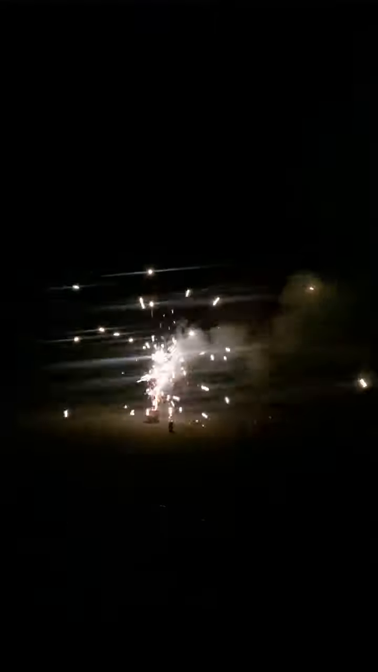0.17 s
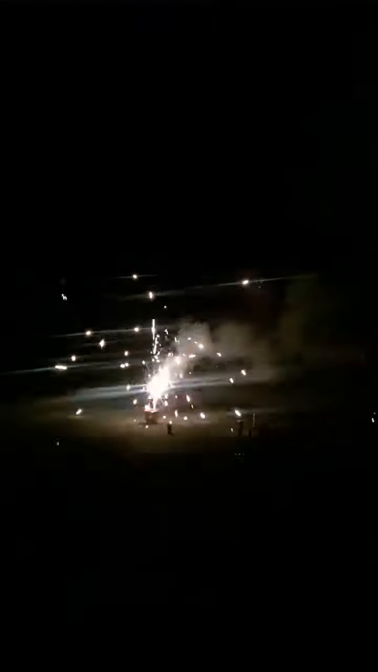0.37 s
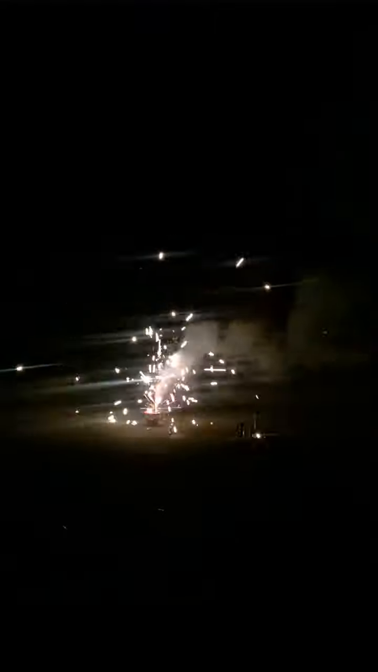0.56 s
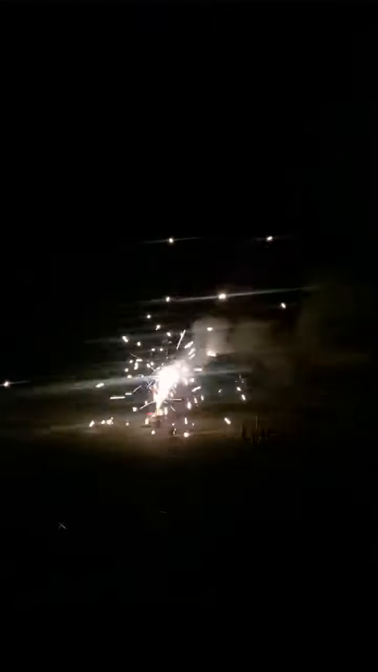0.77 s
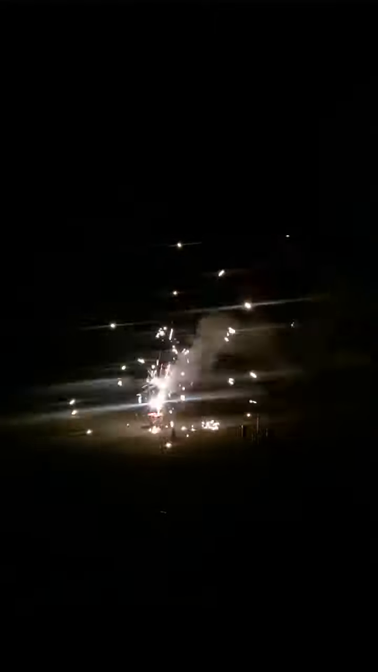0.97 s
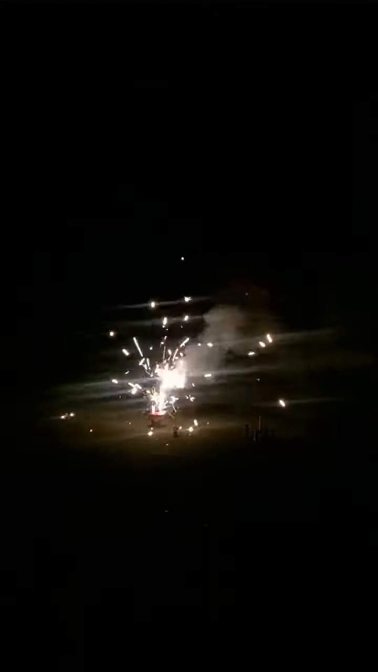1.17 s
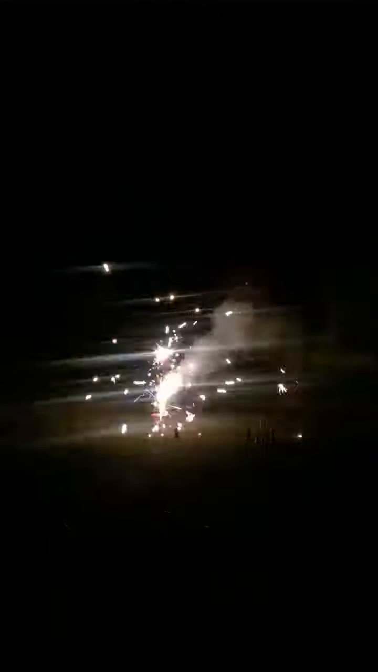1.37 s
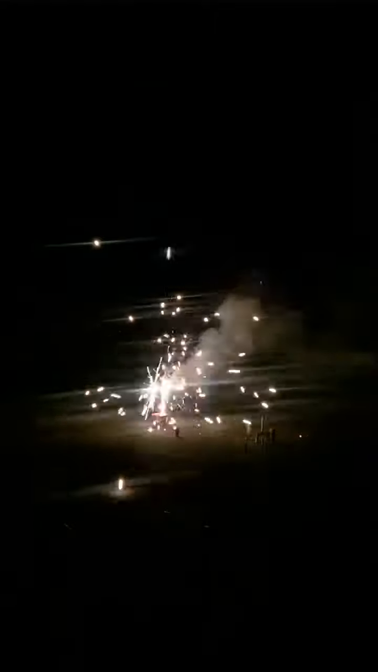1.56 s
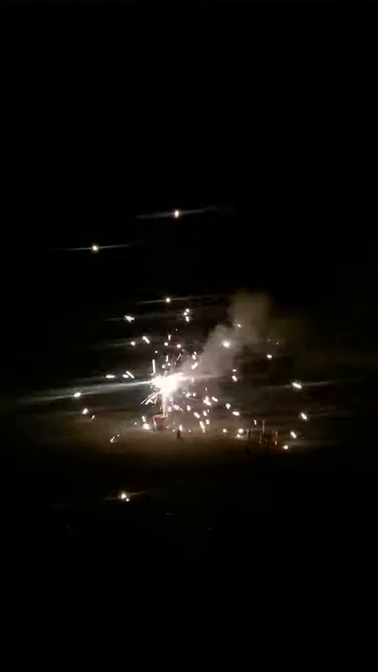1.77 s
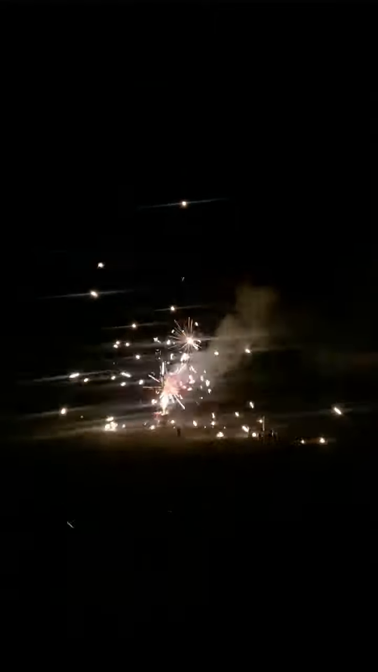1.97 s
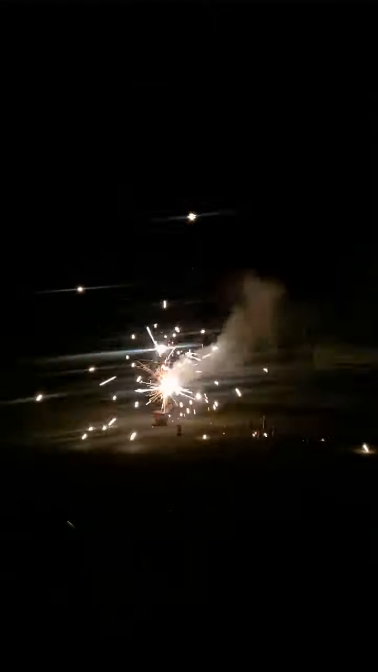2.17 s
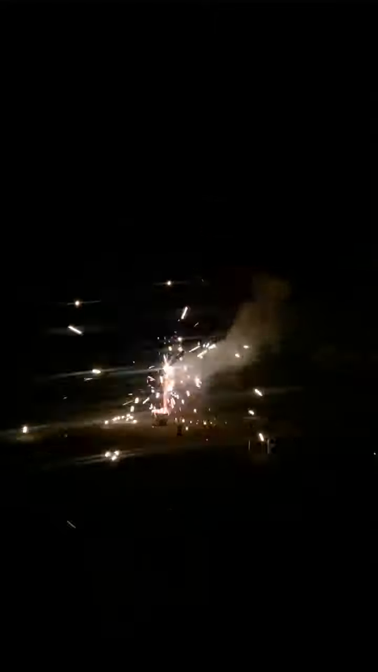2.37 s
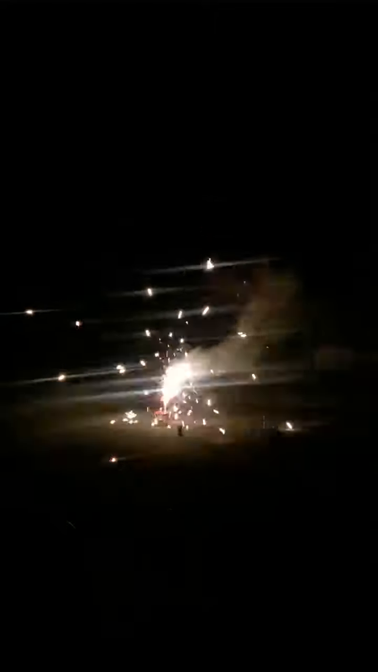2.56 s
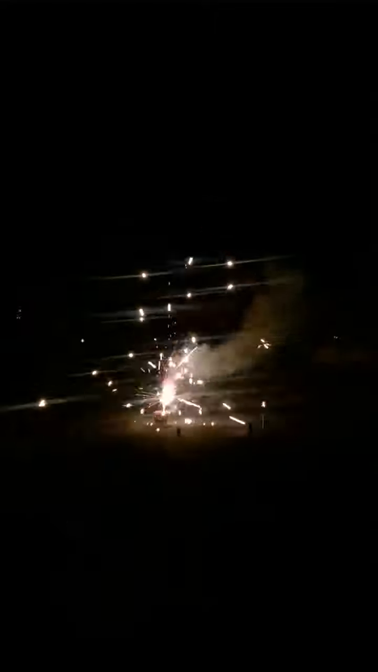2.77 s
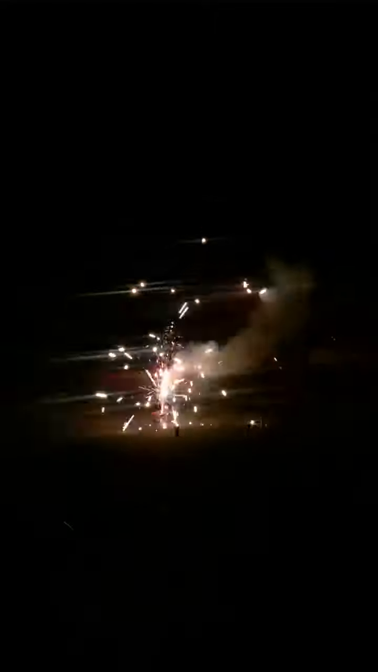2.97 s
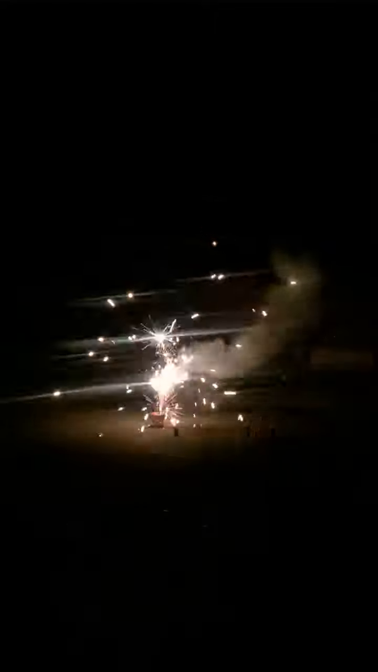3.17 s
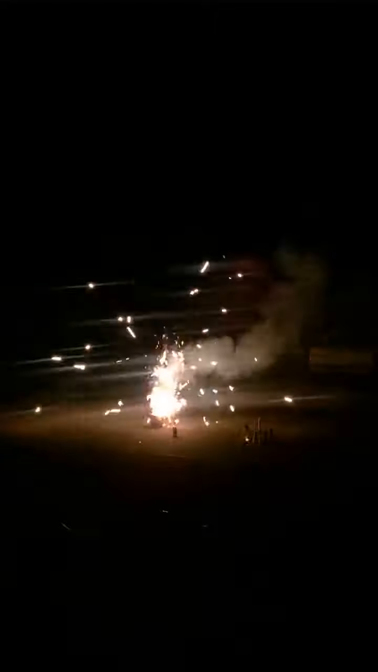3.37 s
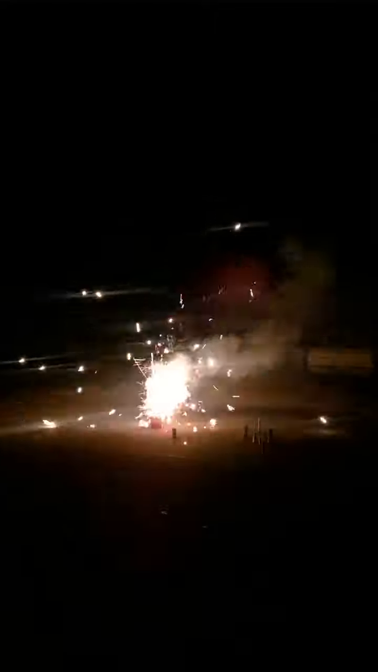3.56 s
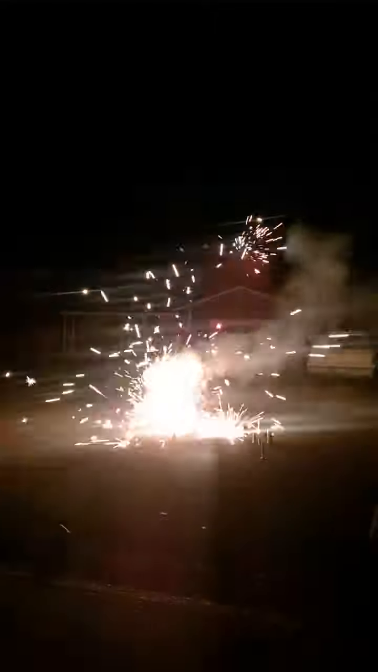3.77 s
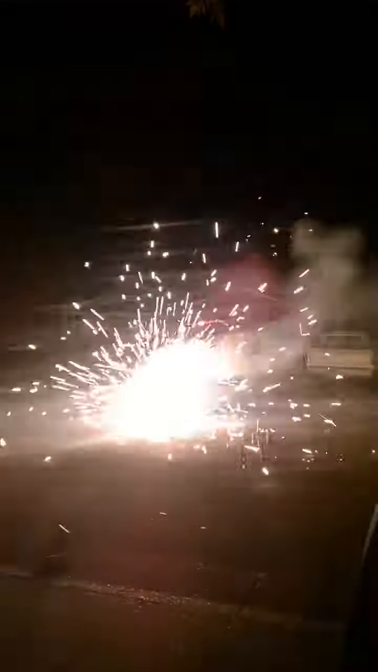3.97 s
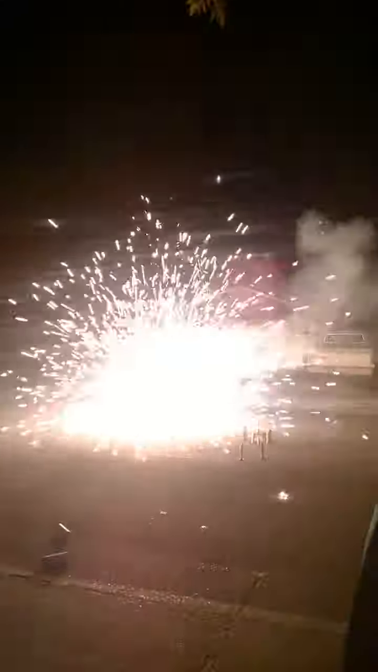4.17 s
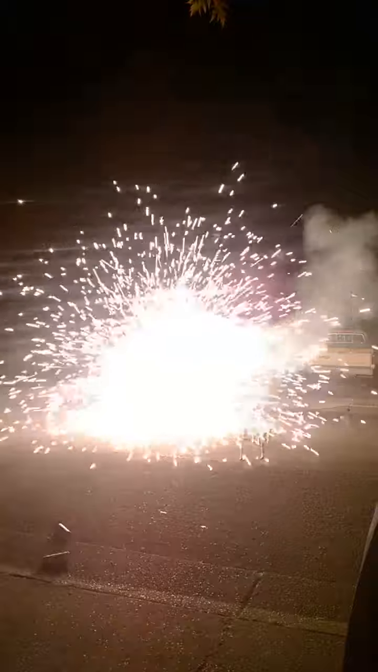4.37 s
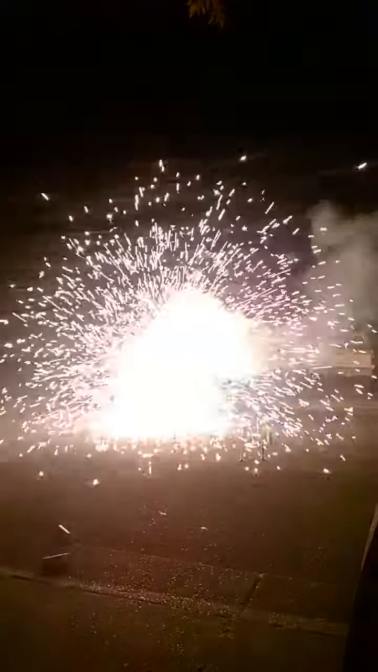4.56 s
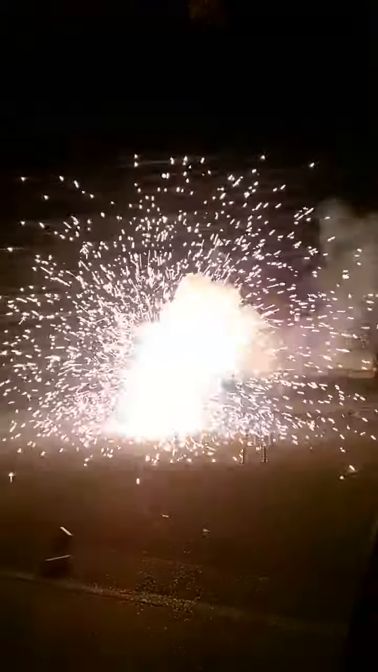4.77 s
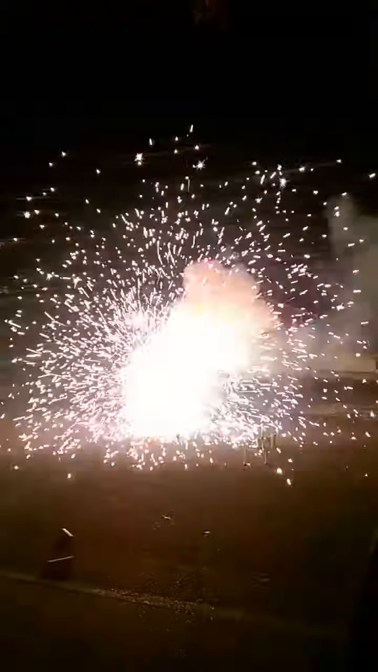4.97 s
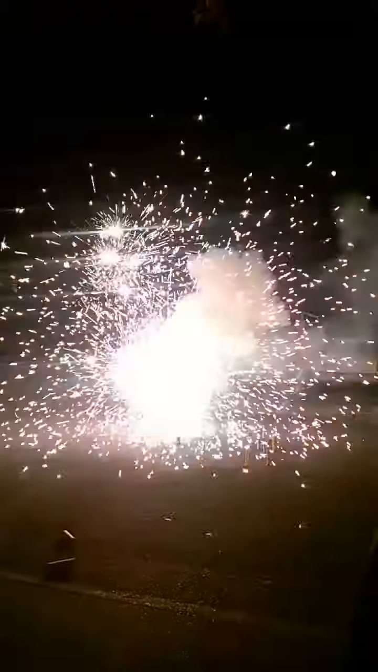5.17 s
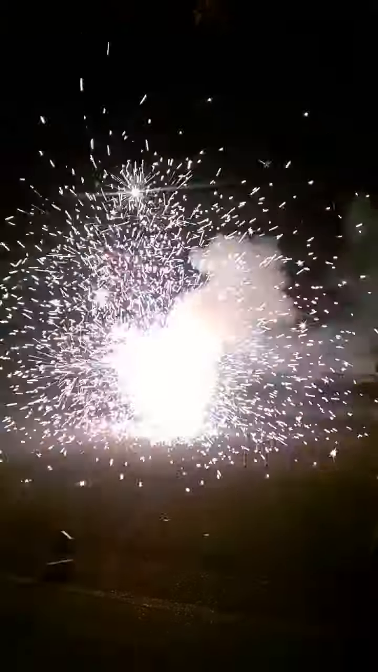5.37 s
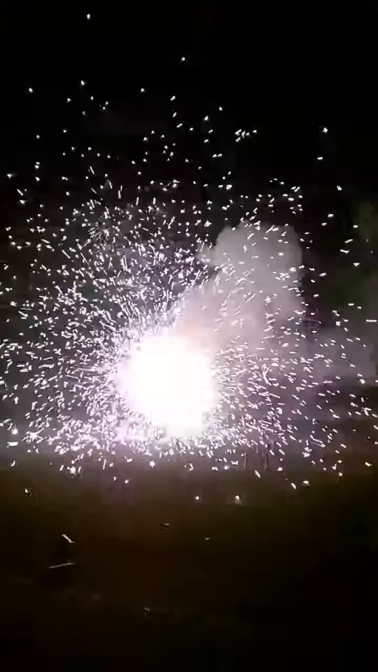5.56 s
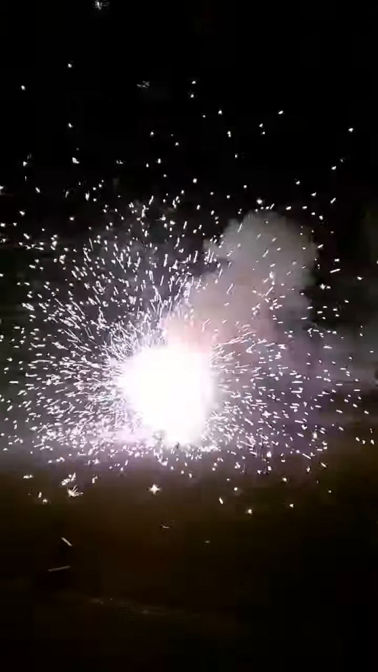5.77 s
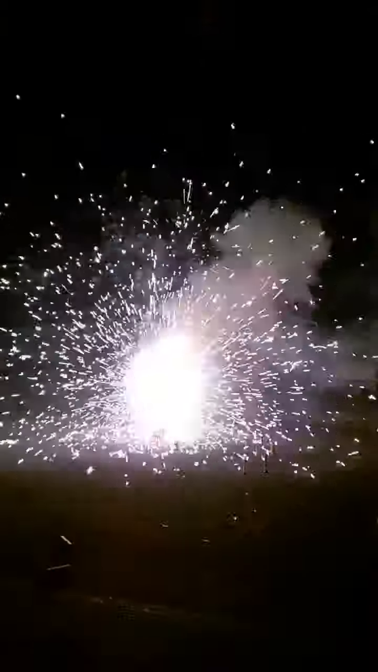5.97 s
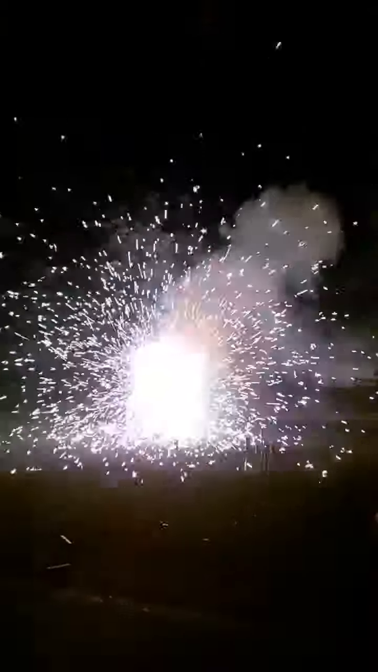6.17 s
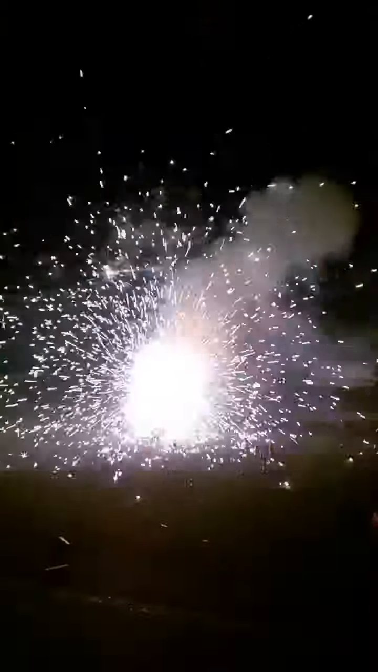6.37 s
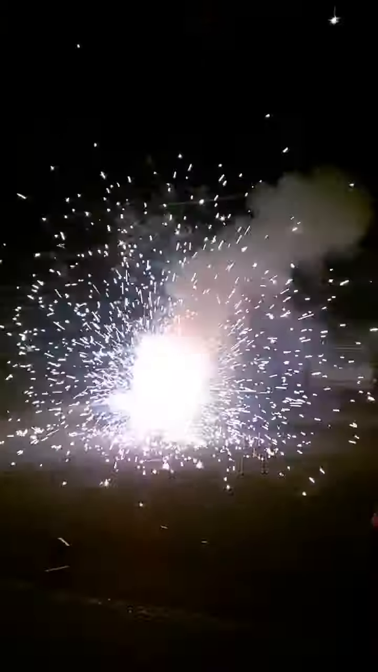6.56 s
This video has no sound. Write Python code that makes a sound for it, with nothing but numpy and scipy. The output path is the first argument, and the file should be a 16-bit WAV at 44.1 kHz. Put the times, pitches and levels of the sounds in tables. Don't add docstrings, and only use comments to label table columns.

```python
import sys
import numpy as np
from scipy import signal
from scipy.fft import rfft, irfft
from scipy.io import wavfile

SR = 44100
rng = np.random.default_rng(int(sys.argv[2]) if len(sys.argv) > 2 else 0)


def int16_out(signal):
    q = np.round(np.clip(np.atleast_2d(signal).T, -1, 1) * 32767)
    wavfile.write(sys.argv[1], SR, q.astype(np.int16))


def makeup_ratio(level_db):
    decades = np.asarray(level_db, float) / 20
    return 10 ** decades


N = 291942
BURST_SAMPLES = 200
BRIGHT_SPREAD_DB = 2.5

# (time [s], level [dB], rate [bursts/s])
SWARM_CURVE = [
    (3.74, -20.5, 40),
    (3.9, -23, 220),
    (4.15, -21.5, 750),
    (5.1, -21, 836),
    (5.14, -21, 250),
    (5.18, -21, 795),
    (5.9, -22, 820),
    (6.27, -21.5, 650),
    (6.62, -23, 680),
]
# (frequency [Hz], density [dB per Hz])
BRIGHT_COLOUR = [(40, -40), (90, -28), (200, -10), (320, -11.5), (520, -10), (1200, -10), (1650, -3.5),
                 (2000, -9), (2450, -7.5), (3600, -7), (5300, 1.5), (7200, -0.5), (10500, -8), (13500, -18),
                 (16000, -25)]


def in_time(rows, s):
    times, *columns = np.transpose(rows)
    return [np.interp(s, times, c) for c in columns]


def coloured(noise, spectrum):
    hz = np.maximum(np.fft.rfftfreq(len(noise), 1 / SR), 1)
    point_hz, point_db = np.transpose(spectrum)
    gain = makeup_ratio(np.interp(np.log(hz), np.log(point_hz), point_db))
    out = irfft(rfft(noise) * gain, len(noise))
    return out / np.std(out)


def ring(x, hz, t60):
    r = makeup_ratio(-60 / (t60 * SR))
    w = 2 * np.pi * hz / SR
    return signal.lfilter([0, np.sin(w)], [1, -2 * r * np.cos(w), r * r], x + 1e-18)


def band(x, low_hz, high_hz):
    return signal.sosfilt(signal.butter(2, [low_hz, high_hz], "band", fs=SR, output="sos"), x)


def lay(s, shapes):
    out = np.zeros(N + BURST_SAMPLES)
    starts = np.round(s * SR).astype(int)[:, None]
    np.add.at(out, starts + np.arange(shapes.shape[1]), shapes)
    return out[:N]


def night_air():
    # (frequency [Hz], density [dB per Hz])
    traffic_colour = [(20, -7), (60, 1.5), (200, -2), (600, -14), (2000, -37), (16000, -45)]
    return makeup_ratio(-47) * coloured(rng.standard_normal(N), traffic_colour)


def thud():
    # (frequency [Hz], level [dB], t60 [s])
    blow_modes = [(169, 5, 0.037), (328, -1, 0.038), (457, 2, 0.032), (650, -1, .04)]
    start_s, echo_s = 0.3122, 0.031
    level_db = -15 + np.array([[0], [-10]])
    blow = lay(start_s + np.array([0, echo_s]), -makeup_ratio(level_db) * np.hanning(40) / 20)
    age = np.arange(N) / SR - start_s - 0.01
    fade = (age > 0) * makeup_ratio(-19 - 60 * np.maximum(age, 0) / 0.33)
    out = band(rng.standard_normal(N), 120, 700) * fade
    for k, (hz, db, t60) in enumerate(blow_modes):
        out = out + (-1) ** k * makeup_ratio(db) * ring(blow, hz, t60)
    return out


def jet():
    # (time [s], level [dB])
    hiss_curve = [
        (0.0, -23.5),
        (0.13, -25),
        (0.38, -25.5),
        (1.95, -23),
        (2.15, -37),
        (2.65, -23),
        (2.94, -29),
        (3.3, -18.5),
        (3.7, -32),
    ]
    level_db, = in_time(hiss_curve, np.arange(N) / SR)
    return makeup_ratio(level_db - 13) * coloured(rng.standard_normal(N), BRIGHT_COLOUR)


def wash(clicks):
    # (from [Hz], to [Hz], t60 [s], level [dB])
    decay_bands = [(10, 990, 0.15, -9.5), (980, 3980, 0.21, -10.5), (4020, 9400, 0.15, -13.5),
                   (8900, 30000, 0.053, -15)]
    s = np.arange(SR // 2) / SR
    noise = rfft(coloured(rng.standard_normal(N), BRIGHT_COLOUR))
    hz = np.fft.rfftfreq(N, 1 / SR)
    rise = 1 - np.exp(-np.maximum(s - 0.003, 0) / 0.0011)
    after = np.maximum(s - 0.04, 0)
    late = makeup_ratio(-41 - 60 * s / 0.38)
    out = 0
    for low_hz, high_hz, t60, db in decay_bands:
        tail = rise * (makeup_ratio(-60 * after / t60) + late)
        share = 1 / (1 + (hz / high_hz) ** 8) - 1 / (1 + (hz / low_hz) ** 8)
        power = np.maximum(signal.fftconvolve(clicks ** 2, tail ** 2)[:N], 0)
        out = out + makeup_ratio(db) * np.sqrt(power) * irfft(noise * share, N)
    return out


def with_ground(rows):
    lag_ms = 2.9 - 0.05 * rows[:, 2] + 0.452 * rng.standard_normal(len(rows))
    return np.c_[rows, np.clip(lag_ms, 1.0, 4.0)]


def with_side_echo(rows):
    chance = rng.random((len(rows), 2))
    lag_s = 0.004 + 0.006 * chance[:, 0]
    loss_db = -19 + 8 * chance[:, 1]
    echo = rows + np.c_[lag_s, loss_db, np.zeros((len(rows), 2))]
    return np.vstack([rows, echo])


def faint_bursts():
    # (time [s], level [dB])
    fainter_bursts = [(.0896, -31), (.2542, -32), (.2732, -35), (.4756, -30), (.5469, -34), (.5866, -30),
                      (.601, -30), (1.097, -30), (1.1587, -29), (1.2515, -30), (1.3572, -27), (1.4504, -31),
                      (1.4702, -30), (1.4973, -29), (1.5643, -28), (1.7229, -30), (1.8795, -32),
                      (1.9027, -32), (1.9834, -28.5), (2.0472, -31), (2.4232, -31), (2.6841, -28),
                      (2.7211, -33), (2.9568, -30), (3.0734, -32), (3.1838, -29), (3.3059, -29), (3.345, -30),
                      (3.4317, -34), (3.5217, -33)]
    s = np.arange(N) / SR
    born = (rng.random(N) < 15 / SR) & (s < SWARM_CURVE[0][0])
    faintest = np.c_[s[born], -41 + 3 * rng.standard_normal(N)[born]]
    rows = np.vstack([fainter_bursts, faintest])
    bright_db = 6.5 + BRIGHT_SPREAD_DB * rng.standard_normal(len(rows))
    return with_ground(np.c_[rows, bright_db])


def single_stars():
    # (time [s], level [dB],
    # brightness [dB])
    volleys = [(.01, -20, 7), (0.0691, -25.5, 8), (0.081, -17.5, 10), (0.1045, -18, 5),
               (.1154, -26, 11), (0.1649, -18.5, 8), (0.1724, -23.5, 12), (.179, -29, 12),
               (0.265, -24.5, 7), (0.3312, -18.5, 13.5), (0.342, -19, 11), (0.3745, -24, 13),
               (0.3786, -22, 9), (.4508, -23.5, 14.5), (0.464, -25, 11), (.4987, -30, 9),
               (0.5586, -21.5, 10), (.567, -25, 2), (.5805, -15, 9), (.67, -19, 6),
               (.702, -16.5, 8.5), (0.7286, -25, 1.5), (0.7573, -22, 11), (0.7734, -22.5, 10),
               (0.8122, -26, 7), (.8284, -23.5, 10), (.867, -22.5, 3), (.896, -19.5, 13),
               (.9346, -22, 9), (0.965, -25.5, 12),
               (.987, -16.5, 5.5), (1.021, -25, 9), (1.032, -25.5, 14), (1.064, -20.5, 8),
                      (1.0724, -24, 7), (1.107, -21, 11), (1.1189, -14, 8.5), (1.1262, -19.5, 13.5),
                      (1.1717, -21.5, 12), (1.1975, -23.5, 9), (1.2112, -28, 11), (1.229, -25, 8),
                      (1.3036, -21.5, 10.5), (1.3134, -23, 11.5), (1.347, -21.5, 14), (1.3622, -22, 10),
                      (1.3724, -23, 10), (1.381, -20.5, 8), (1.4093, -21.5, 9), (1.4292, -22, 6),
                      (1.457, -23.5, 7), (1.4613, -22.5, 7), (1.4918, -24.5, 14.5), (1.511, -19.5, 10),
                      (1.549, -20.5, 5.5), (1.5535, -22.5, 13.5), (1.5854, -25, 10), (1.6188, -26, 7),
                      (1.647, -22, 11),
               (1.7146, -27, 11), (1.7343, -23, 12), (1.752, -20.5, 9), (1.7603, -20, 9),
                     (1.779, -26, 6), (1.8123, -23, 15), (1.832, -21.5, 7), (1.8664, -20, 6.5),
                     (1.9166, -22.5, 11.5), (1.9387, -28, 10), (1.963, -24.5, 10), (1.999, -31, 8),
                     (2.0348, -29, 7.5), (2.0655, -25.5, 12), (2.082, -29, 9), (2.1016, -21.5, 7.5),
                     (2.1362, -21.5, 9.5), (2.149, -25.5, 11), (2.1829, -16.5, 9), (2.21, -22.5, 11),
                     (2.2351, -22.5, 10), (2.2405, -19.5, 7), (2.2687, -21.5, 5.5), (2.3017, -19, 10),
                     (2.313, -16.5, 9.5), (2.356, -19, 8), (2.37, -21, 8), (2.3945, -20, 12),
                     (2.414, -24, 11), (2.4535, -28, 13),
               (2.4895, -22.5, 5), (2.5009, -26.5, 8.5), (2.52, -24.5, 8), (2.553, -20.5, 12.5),
                      (2.5723, -21, 5), (2.5922, -19, 8.5), (2.605, -24, 13), (2.6543, -18, 6),
                      (2.6593, -18.5, 8), (2.6929, -18.5, 10.5), (2.7673, -17, 10), (2.8054, -24, 8),
                      (2.8246, -21.5, 9.5), (2.8474, -22.5, 12), (2.9043, -25, 10), (2.9166, -19, 6),
                      (2.9311, -21, 9), (2.9455, -15.5, 8), (2.9835, -17.5, 8), (3.0226, -12.5, 7.5),
                      (3.0928, -24.5, 8), (3.0978, -26, 7), (3.1093, -21.5, 11), (3.1311, -21, 9),
                      (3.1454, -22, 8), (3.1628, -21, 10), (3.1708, -18.5, 10),
               (3.2252, -21, 11.5), (3.2513, -20.5, 10), (3.2668, -24, 11), (3.28, -22, 10),
                     (3.317, -26, 4), (3.3334, -16, 5.5), (3.3555, -25, -2), (3.3738, -19.5, 6),
                     (3.389, -20, 8), (3.401, -15, 8), (3.411, -16.5, 1.5), (3.4175, -18, 4),
                     (3.4751, -20.5, 9), (3.549, -23, 7.5), (3.589, -21, 7.5), (3.6272, -19.5, 6),
                     (3.6439, -18, 8.5), (3.661, -23.5, 5), (3.708, -16, 8), (3.7335, -23, 3)]
    last_stage_catches = [(3.7443, -21, 9), (3.7497, -17, 1), (3.7594, -14.5, 5), (3.7784, -12.5, 11),
                          (3.7896, -13.5, 8), (3.811, -23, 9), (3.8232, -14.5, 3), (3.8405, -14, 8),
                          (3.846, -14.5, 8), (3.8644, -9.5, 4.5), (3.881, -11.5, 1.5), (3.891, -14, 6),
                          (3.9066, -17, 6), (3.9244, -19.5, 13), (3.947, -16, 4), (3.9629, -12, 8),
                          (3.9704, -13, 6), (3.9993, -11.5, 3), (4.0174, -23, 15), (4.031, -15, -3),
                          (4.0503, -16, 13), (4.059, -15, 3), (4.0958, -10.5, 5)]
    rows = np.vstack([volleys,
                      last_stage_catches])
    return with_side_echo(with_ground(rows))


def swarm():
    s = np.arange(N) / SR
    level_db, per_s = in_time(SWARM_CURVE, s)
    born = (rng.random(N) < per_s / SR) & (s > SWARM_CURVE[0][0])
    chance = rng.standard_normal((3, N))[:, born]
    burst_db = level_db[born] + 3.2 * chance[0]
    bright_db = BRIGHT_SPREAD_DB * chance[1]
    ground_ms = np.clip(2.1 + 0.46 * chance[2], 1.2, 3.2)
    return np.transpose([s[born], burst_db, bright_db, ground_ms])


def loudest_stars():
    # (time [s], level [dB])
    standouts = [(4.133, -7.5), (4.2376, -15), (4.2929, -15.5), (4.3185, -15), (4.3412, -17), (4.351, -13),
                 (4.4135, -11.5), (4.4849, -7), (4.5802, -16), (4.662, -10), (4.7656, -12), (4.8186, -11),
                 (4.9434, -14), (5.0216, -22), (5.0738, -17), (5.1701, -8), (5.2533, -10), (5.3618, -7),
                 (5.4029, -20), (5.584, -13), (5.7798, -8), (5.8821, -10), (6.0799, -9.5), (6.1409, -15),
                 (6.1915, -12.5), (6.2028, -9), (6.3085, -14), (6.4833, -14), (6.54, -20), (6.5735, -13)]
    return with_ground(np.c_[standouts, np.full(len(standouts), 5.3)])


def cracks(rows):
    # (lag [ms], gain [1])
    near_echoes = [(0, 0.64), (0.372, 0.49), (0.547, -0.53), (0.762, 0.95), (1.061, -0.068), (1.212, 0.88),
                   (1.402, -0.039), (1.639, 0.59), (3.001, -0.58)]
    # (frequency [Hz], level [dB], t60 [s])
    housing_modes = [(3026, -2, 0.005), (2521, 3, 0.0078), (1690, -6.5, 0.016), (1215, -10, 0.019),
                     (853, -17.5, 0.016)]
    s, level_db, bright_db, ground_ms = rows.T[:, :, None]
    start_s = s[:, 0]
    ms = np.arange(BURST_SAMPLES) * 1000 / SR
    lag, gain = np.transpose(near_echoes)
    count = len(lag)
    lag_chance = rng.standard_normal((len(rows), count))
    gain_chance = rng.standard_normal((len(rows), count))
    rough = rng.standard_normal((len(rows), BURST_SAMPLES))
    direction = rng.standard_normal((len(rows), len(housing_modes)))

    shock = np.zeros((len(rows), BURST_SAMPLES))
    for k in range(count):
        echo_ms = lag[k] * (1 + 0.035 * lag_chance[:, [k]])
        age = np.maximum(ms - echo_ms, -1e-9) / 0.1
        pulse = (age >= 0) * (1 - age) * np.exp(-0.8 * age)
        shock -= gain[k] * makeup_ratio(1.76 * gain_chance[:, [k]]) * pulse
    shocks = lay(start_s - 0.00007, makeup_ratio(level_db + 9.5) * shock)
    dull = signal.lfilter(*signal.butter(2, 6500, fs=SR), shocks)

    share_db = 3.5 * np.clip(direction, -2, 1.5)
    for k, (hz, db, t60) in enumerate(housing_modes):
        hits = lay(start_s, makeup_ratio(level_db + db + share_db[:, [k]]))
        dull = dull - ring(hits, hz, t60)

    swell = np.clip((ms - 0.6) / 0.15, 0, 1) * np.exp(-np.maximum(ms - ground_ms, 0) / 0.73)
    mirror = 2.2 * np.exp(-((ms - ground_ms + 0.066) / 0.057) ** 2)
    scatter = lay(start_s, makeup_ratio(level_db + bright_db + 2) * (swell * rough + mirror))
    bright = band(scatter, 4940, 7720)
    bright = bright + makeup_ratio(-10.5) * band(scatter, 11600, 12300)
    bright = bright + makeup_ratio(-24) * ring(scatter, 5370, 0.0061)

    clicks = lay(start_s, makeup_ratio(level_db))
    push = -makeup_ratio(-1) * ring(clicks, 177, 0.0053)
    return dull + bright + push, clicks


def scene():
    bursts = np.vstack([faint_bursts(), single_stars(), swarm(), loudest_stars()])
    direct, clicks = cracks(bursts)
    return (night_air() + thud() + jet() + wash(clicks) + direct)[None]


def top_cut(x):
    return signal.sosfilt(signal.butter(12, 16820, fs=SR, output="sos"), x)


def record(dry):
    x = signal.sosfilt(signal.butter(3, 110, "high", fs=SR, output="sos"), dry)
    x = x - 0.32 * band(x, 4580, 5400)
    x = x - 0.17 * band(x, 9600, 10600)
    ceiling = 0.66
    x = x / (1 + (x / ceiling) ** 4) ** 0.25
    x = signal.sosfilt(signal.ellip(12, 0.5, 80, 15740, fs=SR, output="sos"), x)
    return top_cut(x)


dry = scene()
out = record(dry)
int16_out(out)
```